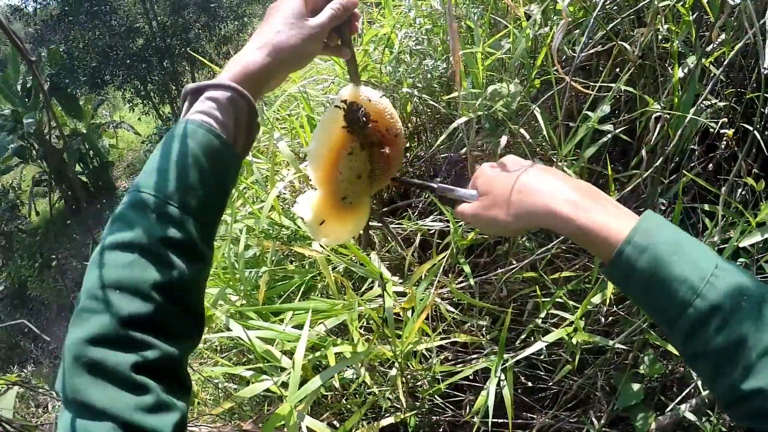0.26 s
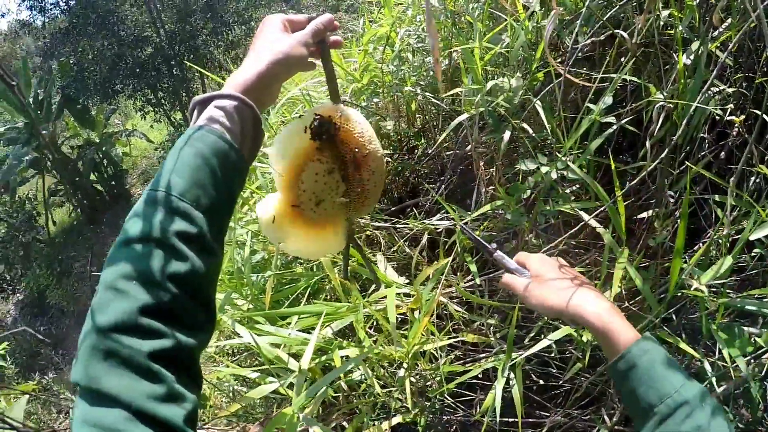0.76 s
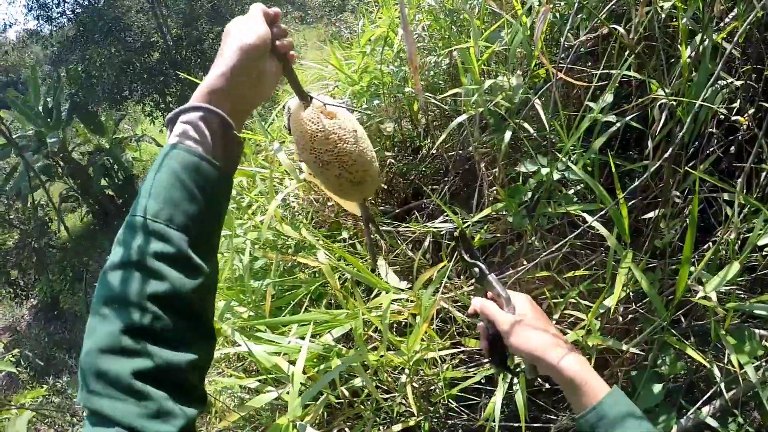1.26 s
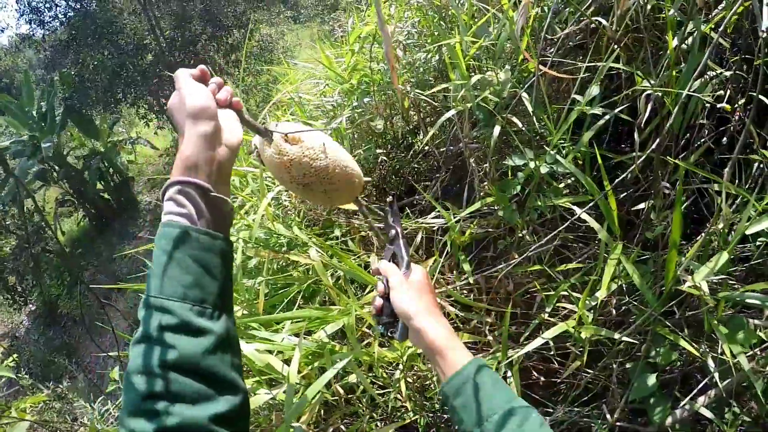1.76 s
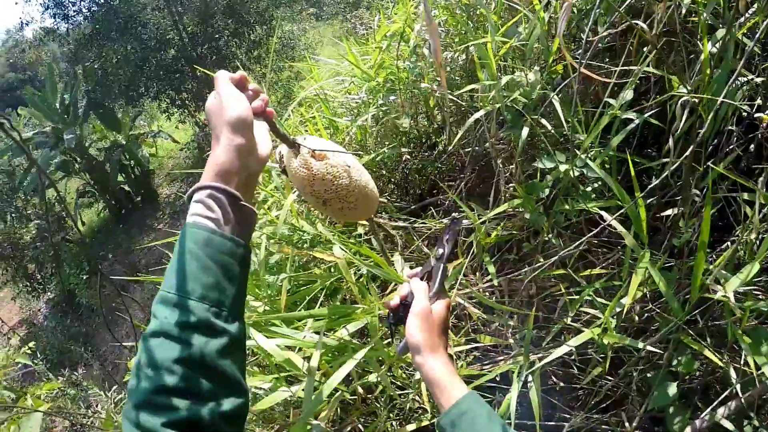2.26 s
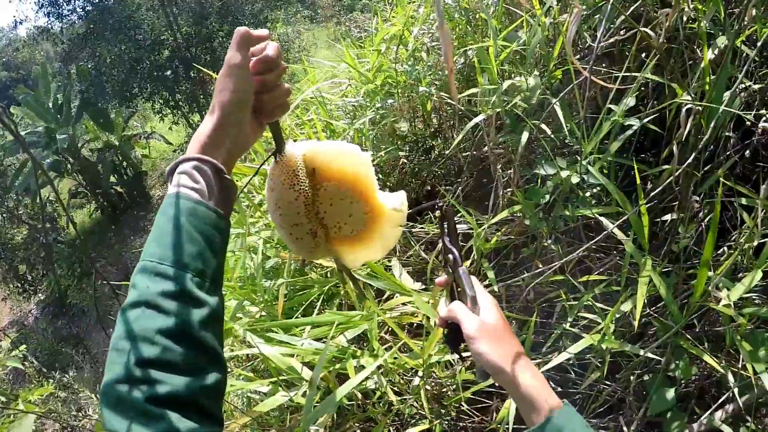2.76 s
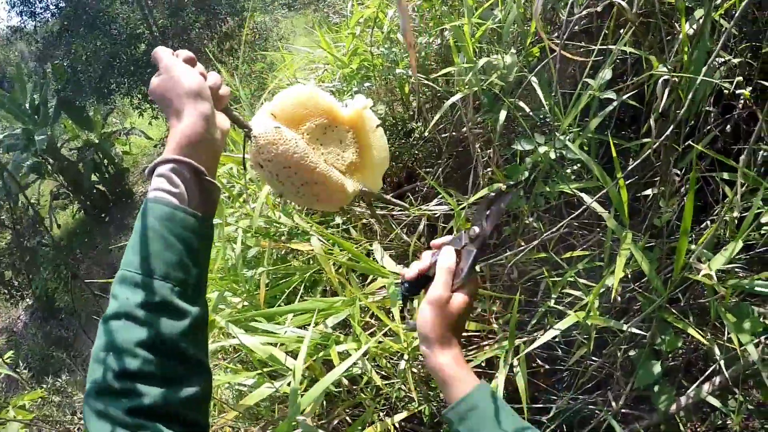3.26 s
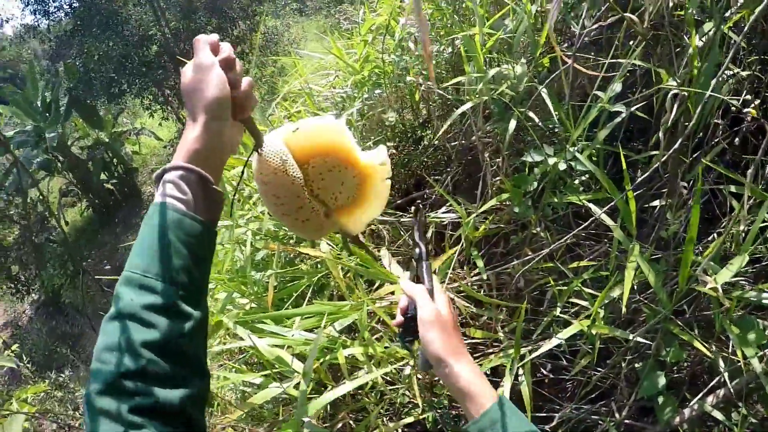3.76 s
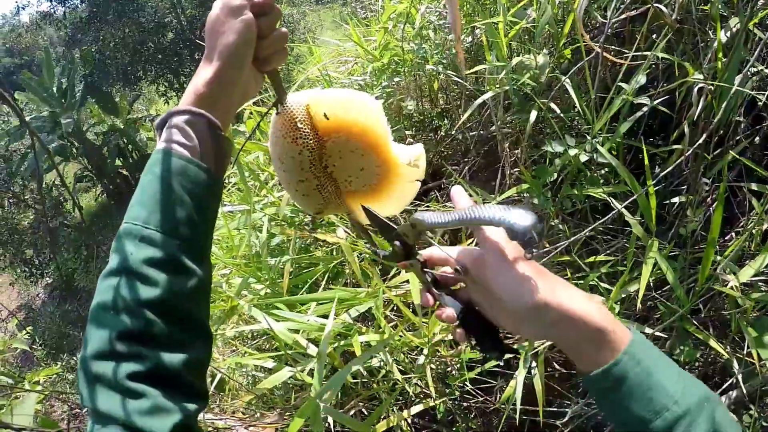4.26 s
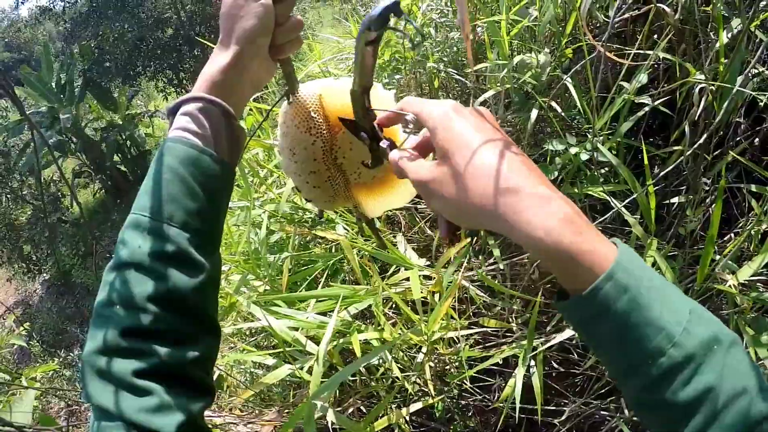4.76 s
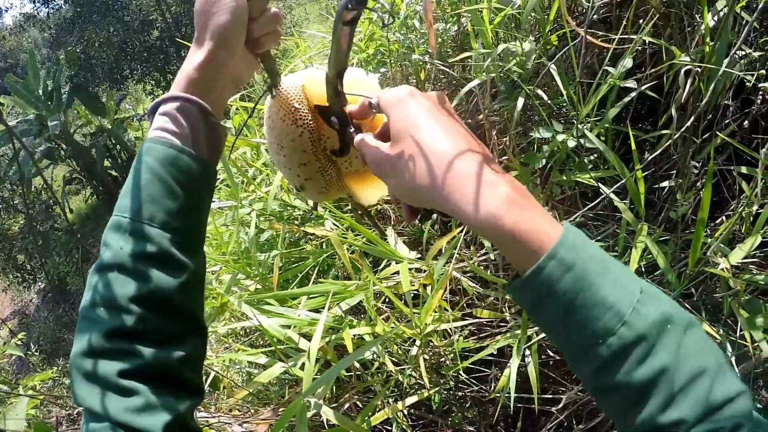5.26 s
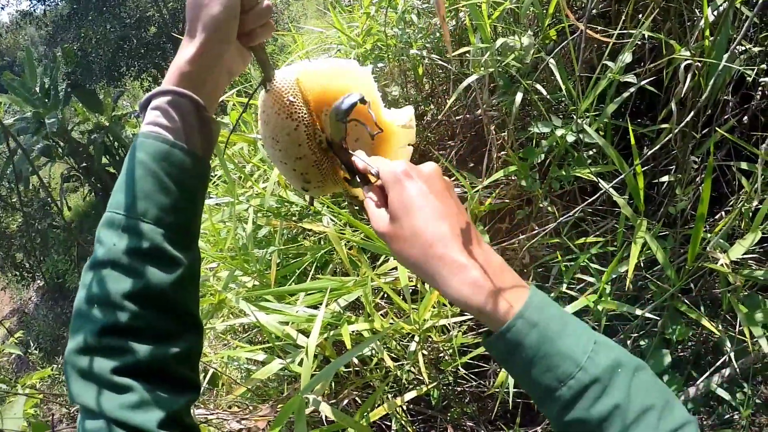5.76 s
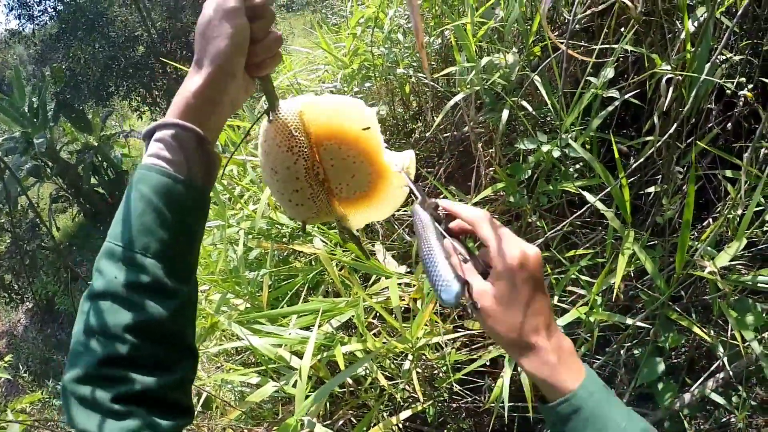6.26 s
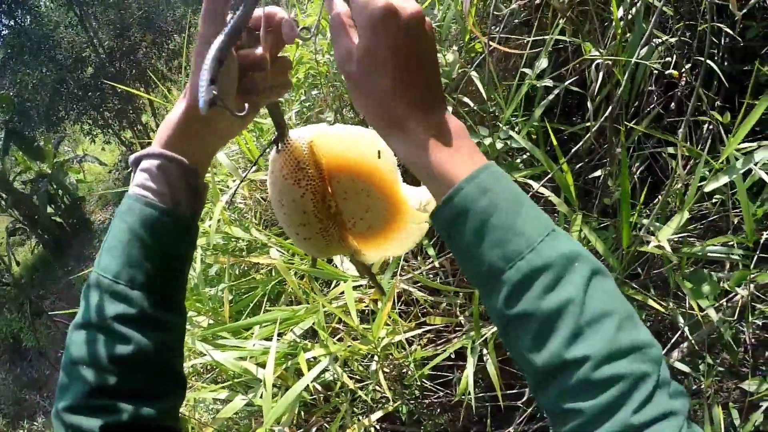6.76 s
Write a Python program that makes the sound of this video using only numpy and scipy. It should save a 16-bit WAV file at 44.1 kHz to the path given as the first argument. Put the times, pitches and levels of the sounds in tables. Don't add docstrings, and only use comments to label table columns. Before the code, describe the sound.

Outdoors, heard from a head-worn microphone: a continuous deep bee buzz swells and sinks over thin leaf hiss and faint far cicadas. Shear blades slide briefly, stems snap in the first half, loudest near the middle, followed by a ringing metallic clack and a gritty snip. Wind rumbles low and fades; a barely audible bird whistles; a few dull knocks end near six seconds.

```python
import sys
import numpy as np
from scipy import signal
from scipy.fft import rfft, irfft
from scipy.io import wavfile
from scipy.ndimage import uniform_filter1d

SR = 44100
rng = np.random.default_rng(int(sys.argv[2]) if len(sys.argv) > 2 else 0)


def level_to_linear(level):
    exponent = np.asarray(level, float) / 20
    return 10 ** exponent


def materialize(psi):
    bounded = np.clip(np.atleast_2d(psi).T, -1, 1)
    quanta = np.round(bounded * 32767).astype(np.int16)
    wavfile.write(sys.argv[1], SR, quanta)


N = 308700
TIME = np.arange(N) / SR


def level(x):
    return x / np.sqrt(np.mean(x ** 2))


def band(x, hz, width_hz, order=1):
    edges = [hz - width_hz / 2, hz + width_hz / 2]
    return signal.sosfilt(signal.butter(order, edges, "bandpass", fs=SR, output="sos"), x)


def slice_hz(x, low_hz, high_hz):
    hz = np.fft.rfftfreq(N, 1 / SR)
    return irfft(rfft(x) * ((hz > low_hz) & (hz < high_hz)), N)


def walk(rate, size):
    knots = rng.standard_normal((size[0], 400))
    at = np.linspace(0, min(rate * N / SR, 398), size[1])
    return np.array([np.interp(at, np.arange(400), k) for k in knots]) * 1.2


def wander(rate):
    return walk(rate, (1, N))[0]


def coloured(points):
    hz, db = np.transpose(points)
    grid = np.log(np.fft.rfftfreq(N, 1 / SR) + 1)
    shape = level_to_linear(np.interp(grid, np.log(hz), db))
    return level(irfft(rfft(rng.standard_normal(N)) * shape, N))


def wing_beats(count=72, swerve=.045, swerve_rate=14, near_db=4, near_rate=10, cut_hz=124):
    lowest_hz, spread_hz = 139.6, 44
    second_db, third_db = -12.5, -30
    size = (count, N // 4)
    seconds = np.arange(size[1]) * 4 / SR
    rank = (np.arange(count)[:, None] + .5) / count
    own_hz = lowest_hz + spread_hz * (-np.log(1 - rank)) ** .75
    own_hz = own_hz * (1 + .006 * seconds)
    beat_hz = own_hz * np.exp(swerve * walk(swerve_rate, size))
    phase = np.cumsum(2 * np.pi * beat_hz * 4 / SR, axis=1)
    stroke = np.sin(phase) + level_to_linear(second_db) * np.sin(2 * phase) + level_to_linear(third_db) * np.sin(3 * phase)
    nearness = level_to_linear(near_db * walk(near_rate, size))
    hum = signal.resample_poly((stroke * nearness).sum(axis=0), 4, 1)
    return level(signal.sosfilt(signal.butter(8, cut_hz, "highpass", fs=SR, output="sos"), hum))


# time in seconds, level in dB.
SWARM_LEVELS = [(0, -44), (.3, -37.5), (.85, -35), (1.6, -37), (2.3, -35.5), (2.9, -38.5), (3.7, -36.5),
                (5, -37.5), (6, -37), (6.6, -39), (7, -36)]


def bees():
    return wing_beats() * level_to_linear(np.interp(TIME, *np.transpose(SWARM_LEVELS)))


def strike(s, contact_ms, modes, rise_ms=0.17, lead_ms=3, smear_ms=7.5):
    out = np.zeros(N)
    ms = (np.arange(4096) - 2048) * 1000 / SR
    push = np.where(ms > 0, np.exp(-ms / contact_ms), np.exp(np.minimum(ms, 0) / rise_ms))
    halo = np.exp(-.5 * ((ms + lead_ms) / smear_ms) ** 2)
    grit = rng.standard_normal((len(modes), 2, 4096))
    for (hz, width_hz, db, smear_db), noise in zip(modes, grit):
        scrape = contact_ms / 5 * np.sqrt(SR / width_hz / 4) + (hz / 5000) ** 2
        contact = (np.cos(2 * np.pi * hz * ms / 1000) + scrape * noise[0]) * push
        ring = band(contact, hz, width_hz, order=2)
        smear = halo * level(band(noise[1], hz + 80, .4 * width_hz, order=2))
        out[int(s * SR) - 2048:][:4096] += level_to_linear(db) * (ring / np.abs(ring).max() + level_to_linear(smear_db) * smear)
    return out


# time in seconds, camera housing note in dB,
# thud in dB, crack in dB, contact in milliseconds.
STEM_SNAPS = [(0.104, -31, -28.5, -25, 8.7), (1.7968, -12, -21.5, -10.5, 0.66),
              (1.872, -33, -34, -35, 0.83), (2.117, -25, -39, -28.5, 0.51), (2.395, -29.5, -29.5, -28, 2),
              (3.3992, -2.5, -10.5, -7, 0.27), (3.681, -8, -15, -17, 2.2), (4.179, -23.5, -21, -19, 0.82),
              (5.9536, -22, -44, -33, 4.1), (5.961, -24.5, -44, -55, 3.2), (5.972, -27.5, -50, -48, 14),
              (5.989, -34, -32.5, -46, 7.3), (6.064, -38, -42, -44, 4.9), (6.075, -45, -48, -50, 4)]


def stems():
    hard_db, rebound_s, rebound_ms = -18, 0.00348, 1.5
    rebound_thud_db, rebound_crack_db = -3.5, -17
    edge_db = -9.5
    hits = list(STEM_SNAPS)
    for s, note, thud, crack, ms in STEM_SNAPS:
        if note > hard_db:
            hits.append((s + rebound_s, note + rebound_crack_db, thud + rebound_thud_db,
                         crack + rebound_crack_db, rebound_ms))
    out = np.zeros(N)
    for s, note, thud, crack, ms in hits:
        out += strike(s, ms, [(338, 440, thud, -22), (1004, 896, note, -27.5),
                              (1815, 1300, crack, -35), (3140, 1900, crack + edge_db, -31)])
    return out


def steel(clacks, hiss_db):
    out = np.zeros(N)
    for s, ring, hz, grit, ms in clacks:
        hiss = grit + hiss_db
        out += strike(s, ms, [(hz, 720, ring, -19), (3800, 1800, grit, -24),
                              (6500, 2600, hiss - 4, -25), (10500, 7000, hiss - 3.5, -27)])
    return out


# time in seconds, ring in dB, ring pitch in Hz,
# grit in dB, contact in milliseconds.
BLADE_SLIDES = [
    (.103, -25, 2310, -37, 8),
    (.1129, -16.5, 2700, -21, 1.3),
    (4.1788, -16.5, 2880, -25, 3.9),
]


def shear_blades():
    return steel(BLADE_SLIDES, 0.5)


# time in seconds,
# ring in dB, ring pitch in Hz, grit in dB, contact in milliseconds.
GRIP_KNOCKS = [
    (2.1166, -26.5, 2480, -32.5, 1.2),
    (2.3952, -35, 2370, -36, 1.1),
    (3.3992, -20, 3000, -38, 0.51),
    (3.6824, -10.5, 3550, -16.5, 0.86),
    (3.6832, -21, 1630, -40, 1.5),
    (4.18, -25, 3830, -11, 4.8),
    (4.189, -29, 2580, -18.5, 7.6),
    (5.99, -50, 3580, -44, 6),
    (6.076, -38, 2800, -51, 3.3),
]


def shear_grips():
    return steel(GRIP_KNOCKS, -21)


# start in seconds, build-up in seconds, hold in seconds,
# peak in dB, dying away in dB per second.
GUST_TIMES = [
    (-.1, 0.14, 0.071, -39, 10),
    (2.6, .62, 0.89, -30.5, 10.5),
]


def gust_db():
    calm_db = -57
    rows = []
    for s, rise, hold, db, fade in GUST_TIMES:
        build = np.interp(TIME, [s, s + rise], [calm_db, db])
        rows.append(build - fade * np.maximum(TIME - s - rise - hold, 0))
    return np.maximum(np.max(rows, axis=0), calm_db) + 1.85 * wander(6)


# pitch in Hz, strength in dB per Hz.
WIND_COLOUR = [
    (15, -0.5),
    (30, 2.5),
    (60, -2.5),
    (110, -6.5),
    (250, -19.5),
    (600, -92),
]


def wind(flutter_db=1.6):
    rumble = level(coloured(WIND_COLOUR) * level_to_linear(flutter_db * wander(9.3)))
    return rumble * level_to_linear(gust_db())


def cicadas(count=8, drift=.004, throb_db=3, blur_db=-3.5):
    chorus_hz, width_hz = 5320, 270
    hz = chorus_hz + width_hz * np.linspace(-.5, .5, count)[:, None]
    phase = np.cumsum(2 * np.pi * hz * np.exp(drift * walk(8.8, (count, N))) / SR, axis=1)
    singers = (np.sin(phase) * level_to_linear(throb_db * walk(45, (count, N)))).sum(axis=0)
    blur = band(rng.standard_normal(N), chorus_hz, width_hz, order=2)
    chorus = level(level(singers) + level_to_linear(blur_db) * level(blur))
    return chorus * level_to_linear(-56.5 + 0.1 * TIME)


def nearer_cicada(throb_db=3):
    peak_s, span_s, top_hz, sag_hz, peak_db = .6, .2, 5400, 25.47, -54.5
    away = ((TIME - peak_s) / span_s) ** 2
    phase = np.cumsum(2 * np.pi * (top_hz - sag_hz * np.minimum(away, 4)) / SR)
    return np.sin(phase) * np.exp(-away / 2) * level_to_linear(peak_db + throb_db * wander(25.8))


def shaken_leaves():
    start_s, start_db, fade_db_per_s = 2, -48, 27
    fading = (TIME > start_s) * level_to_linear(start_db - fade_db_per_s * np.abs(TIME - start_s))
    return fading * level(band(rng.standard_normal(N), 1290, 910, order=2))


# pitch in Hz, strength in dB per Hz.
LEAF_COLOUR = [(100, -27), (300, 4), (520, -2), (800, -4.5), (1090, 0.5), (1400, -6), (1700, -6.5),
               (2400, -11), (3180, -5.5), (3900, -13.5), (4850, -17), (7200, -20.5), (9700, -17.5),
               (10000, -13.5), (10400, -19), (15200, -25)]


def leaves():
    return coloured(LEAF_COLOUR) * level_to_linear(-46.5 + 0.5 * wander(12))


# time in seconds, upper note in Hz, level in dB.
BIRD_NOTES = [
    (4.2, 3850, -62),
    (4.28, 3900, -62),
    (4.31, 3960, -57),
    (4.4, 4030, -58),
    (4.46, 3850, -63),
    (4.5, 3800, -80),
]


def bird(lower=.93, blur_hz=80):
    s, hz, db = np.transpose(BIRD_NOTES)
    phase = np.cumsum(2 * np.pi * np.interp(TIME, s, hz) / SR)
    flutter = level(slice_hz(rng.standard_normal((2, N)), 0, blur_hz))
    upper_note = (1 + 0.45 * flutter[0]) * np.sin(phase)
    lower_note = 1.2 * flutter[1] * np.sin(lower * phase)
    return (upper_note + lower_note) * level_to_linear(np.interp(TIME, s, db, -120, -120))


# pitch in Hz, level in dB.
WHINE_TONES = [
    (9975, -82),
    (11138, -92),
    (11999, -100),
    (12861, -79),
    (14853, -74),
]


def electronics():
    out = np.zeros(N)
    for hz, db in WHINE_TONES:
        out += np.sqrt(2) * level_to_linear(db) * np.sin(2 * np.pi * hz * TIME + 1.6 * wander(7.7))
    return out


def scene():
    mono = bees() + stems() + shear_blades() + shear_grips() + wind()
    mono = mono + cicadas() + nearer_cicada() + shaken_leaves() + leaves() + bird() + electronics()
    return np.array([mono, mono])


def roll_off(x):
    return signal.sosfilt(signal.butter(12, 15770, fs=SR, output="sos"), x)


# start in seconds, end in seconds.
TREBLE_GAPS = [
    (0, .05),
    (.13, .18),
    (1.22, 1.27),
    (1.37, 1.41),
    (1.85, 2.28),
    (2.5, 3.38),
    (3.45, 3.64),
    (3.72, 4.15),
    (4.21, 7),
]


def record(dry):
    top_hz = 15300
    spans = sum(1. * ((TIME >= a) & (TIME < b)) for a, b in TREBLE_GAPS)
    lost = uniform_filter1d(spans, size=300)
    mono = slice_hz(dry[0], 0, top_hz)
    mono = mono - lost * slice_hz(mono, 11130, 11800)
    edge = lost * level_to_linear(-72.0) * level(slice_hz(rng.standard_normal((2, N)), 11530, 11800))
    crumbs = level_to_linear(-87 + 10 * wander(14)) * level(slice_hz(rng.standard_normal(N), 11000, top_hz))
    return roll_off(mono + edge + np.array([crumbs, -crumbs]))


dry = scene()
out = record(dry)
materialize(out)
```